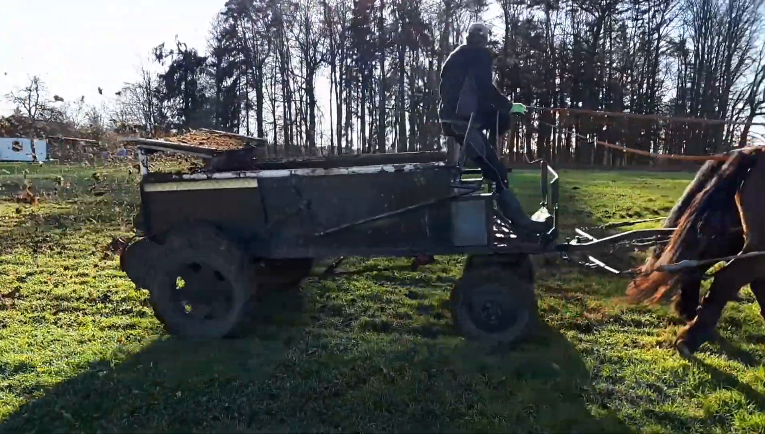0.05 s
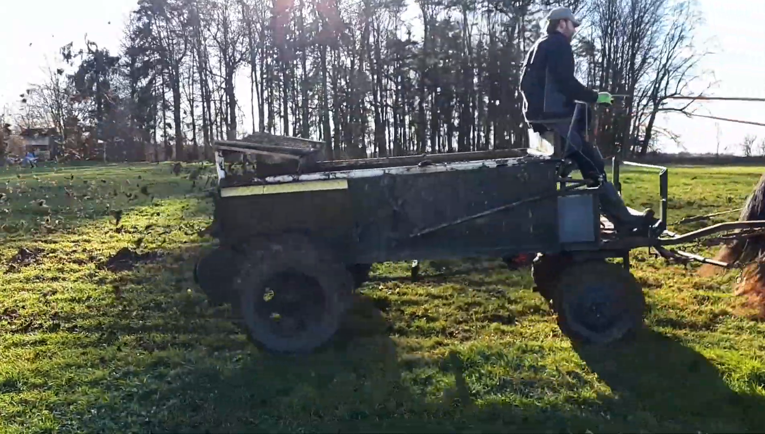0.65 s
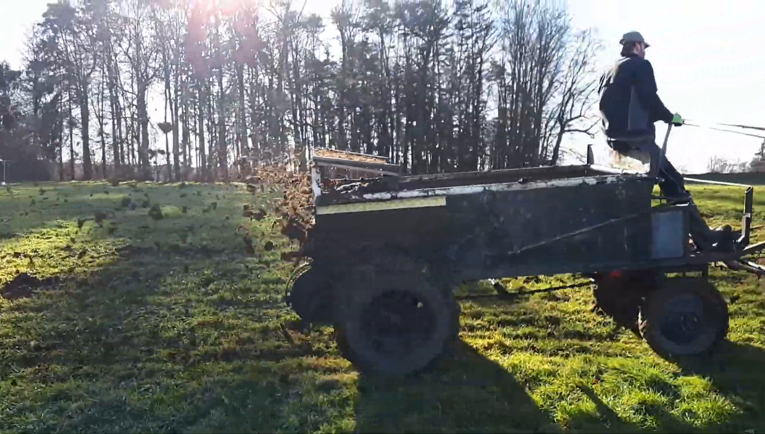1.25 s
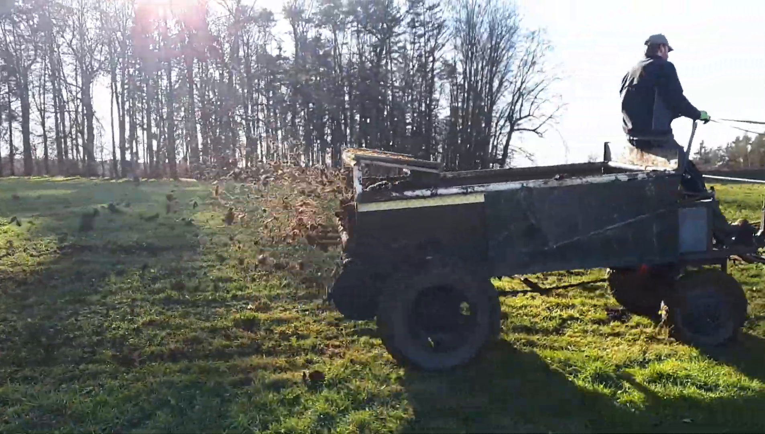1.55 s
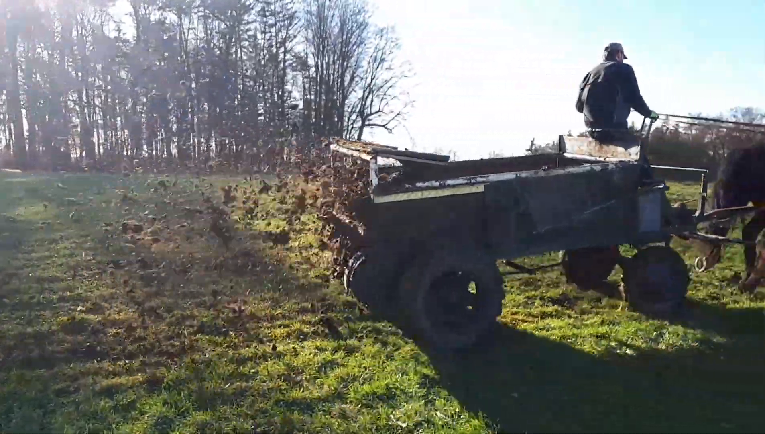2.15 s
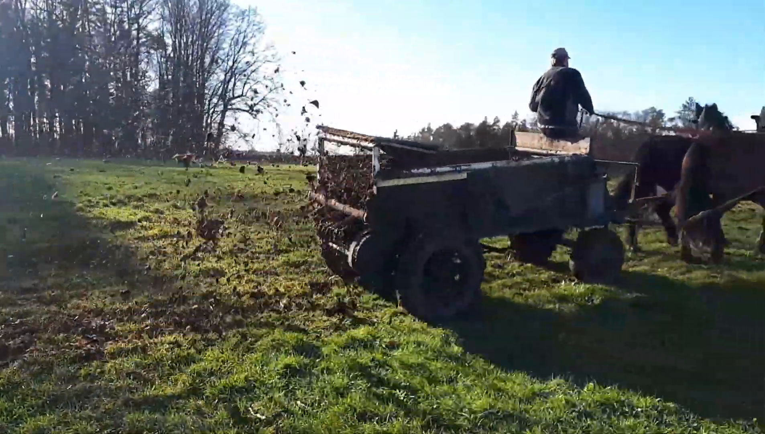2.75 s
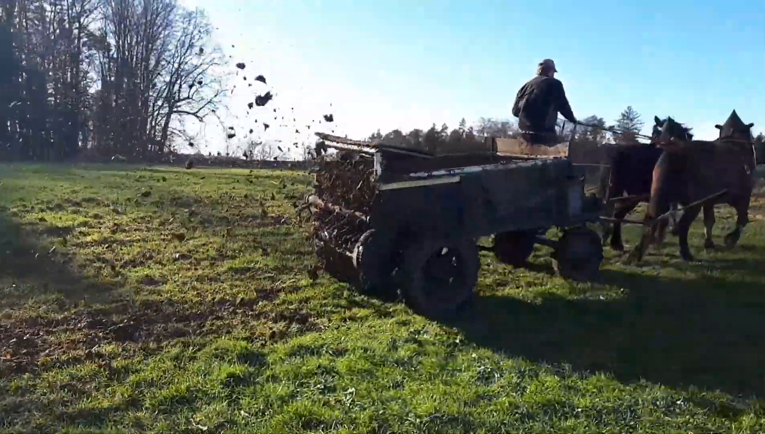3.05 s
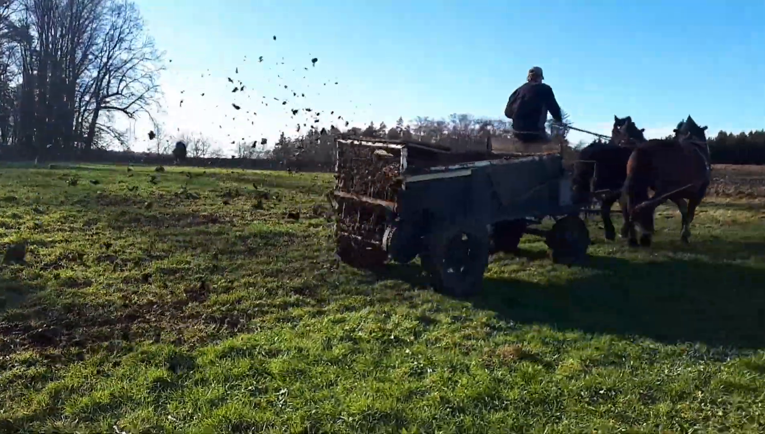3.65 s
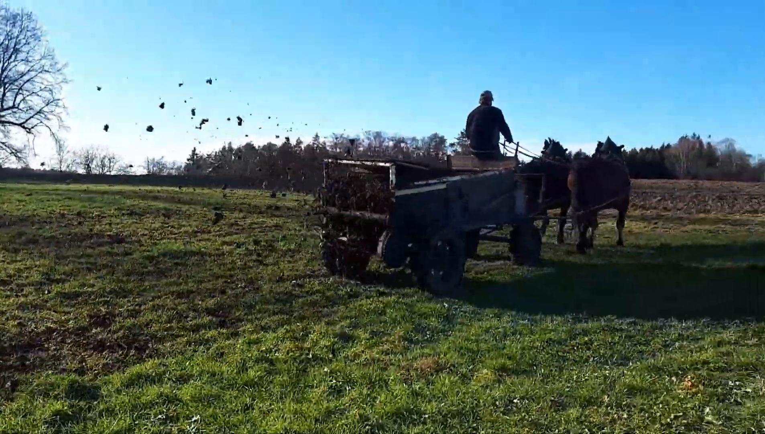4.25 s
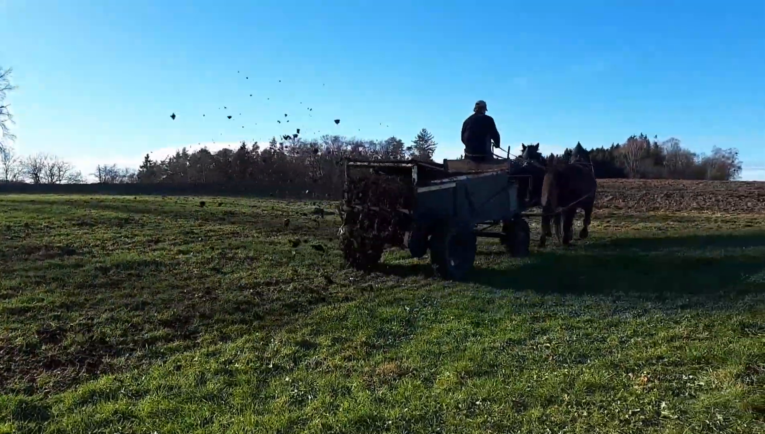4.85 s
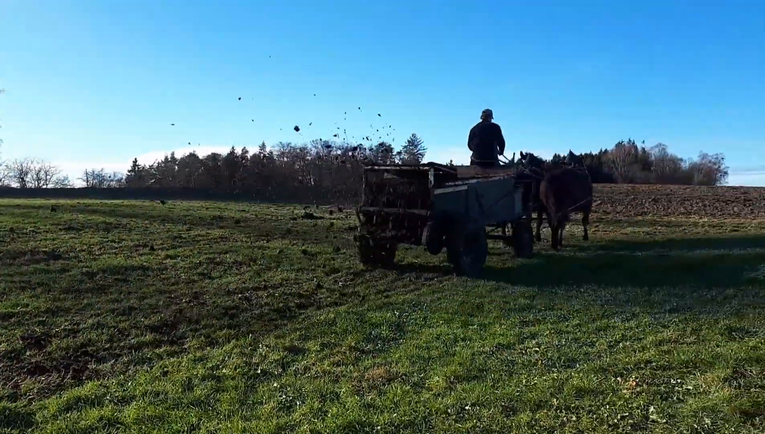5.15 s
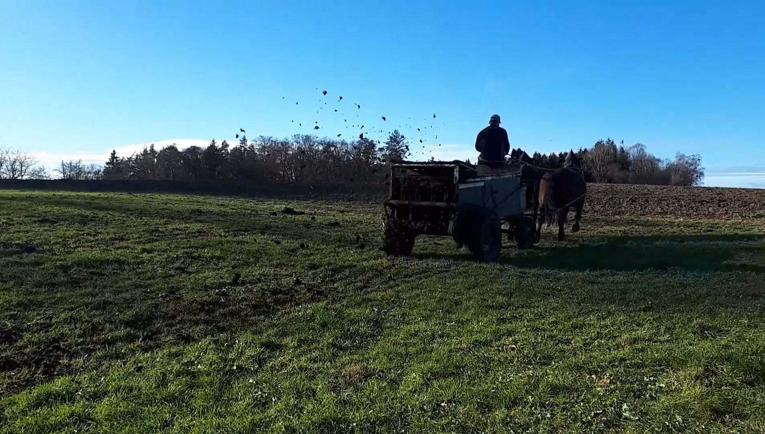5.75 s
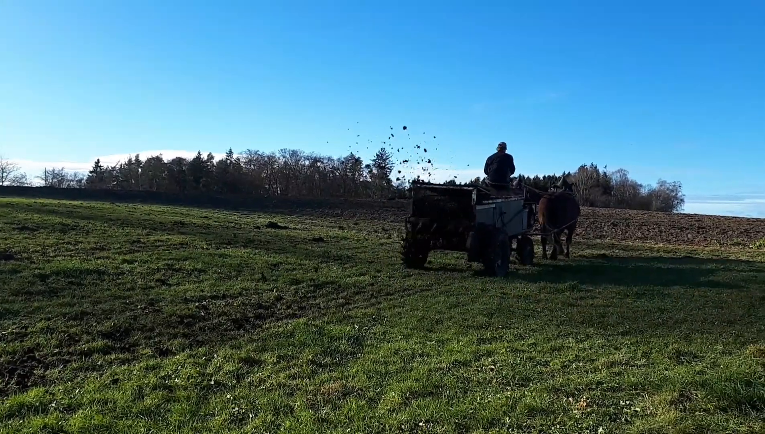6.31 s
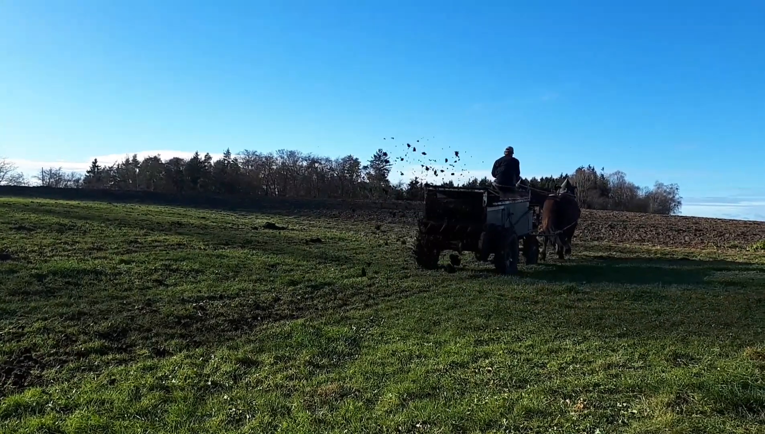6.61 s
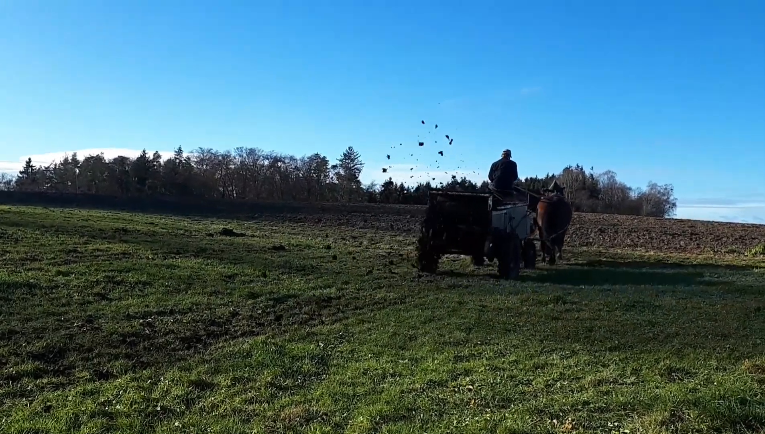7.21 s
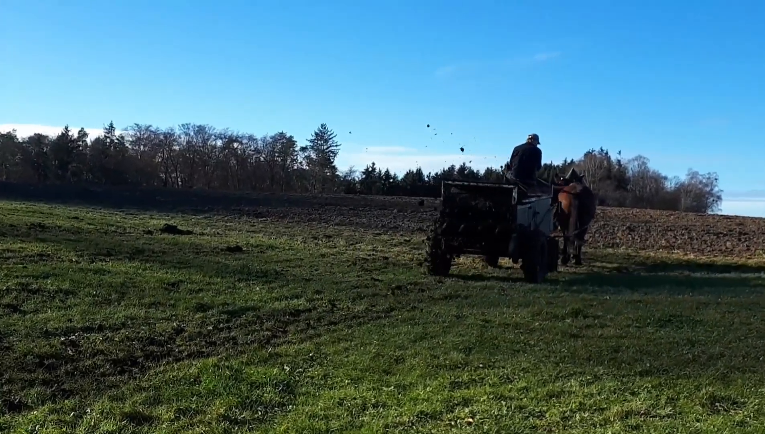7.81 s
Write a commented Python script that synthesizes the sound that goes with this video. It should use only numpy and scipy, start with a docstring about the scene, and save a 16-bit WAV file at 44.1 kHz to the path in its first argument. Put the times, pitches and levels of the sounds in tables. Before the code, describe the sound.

Irregular wooden knocks and a ringing chain clink come from a farm spreader cart rolling near the microphone across a grass field. Underneath, the wheels rumble, the drum churns and straw hisses faintly. The clatter gives way to lighter taps, steel snaps and short scrapes as the cart moves off, while gusts of wind on the microphone build and become the loudest sound near the end.

```python
"""An open grass field, a stereo microphone out in the wind, close to a passing horse-drawn manure spreader.
The cart rumbles by from the left and draws off across the field. Its drive knocks against the boards
of the box, a steel catch snaps, rods scrape and chain links clink. The beater shreds and flings the
load: the drum churns and taps, and straw hisses. Gusts buffet the microphone more and more."""
import sys
import numpy as np
from scipy import signal
from scipy.fft import rfft, irfft, next_fast_len
from scipy.io import wavfile
from scipy.ndimage import map_coordinates

SR = 44100
rng = np.random.default_rng(int(sys.argv[2]) if len(sys.argv) > 2 else 0)


def dump(signal):
    """Clip the signal to [-1, 1] and save it as 16-bit WAV at the path in sys.argv[1]."""
    limited = np.clip(np.atleast_2d(signal).T, -1, 1)
    pcm = np.round(limited * 32767).astype(np.int16)
    wavfile.write(sys.argv[1], SR, pcm)


N = 355887
TIME = np.arange(N) / SR

# resonances of the wooden box, steel frame and beater drum: (frequency [Hz], width [Hz], gain [dB])
BOX = [(392, 69, 4), (597, 39, 2.5), (763, 246, -2), (1080, 273, 5), (1246, 76, 7), (1504, 253, -3.5),
       (1776, 207, 2), (1822, 61, 2.5), (2056, 83, -5.5), (2335, 300, -8.5), (3730, 250, -12.5),
       (4500, 500, -16.5), (5470, 3000, -26), (6850, 390, -30)]
FRAME = [(870, 1250, 7.5), (1810, 290, 12.5), (2425, 184, 21), (2430, 64, -15), (3640, 110, 10),
         (4460, 1320, 6), (4570, 240, 2), (4750, 880, 0), (5930, 650, 6.5), (11270, 1250, -7.5),
         (13000, 9200, -11.5)]
DRUM = [(880, 580, 1.5), (1497, 367, 9), (1676, 270, 11), (2250, 360, 3)]
# the working beater as heard at the microphone: (time [s], churn level [dB], straw level [dB])
BEATER_LEVELS = [(0, -38, -33.5), (.3, -43, -45.5), (1.1, -37, -47), (1.7, -37, -45.5), (2.6, -32.5, -43.5),
                 (3.2, -36.5, -45), (3.8, -38, -47), (5, -36, -46), (6.1, -39, -45.5), (7.4, -41.5, -52),
                 (7.85, -66, -55.5), (8.07, -49, -54)]


def from_db(db):
    """Decibels to gain."""
    return 10 ** (np.asarray(db) / 20)


def rms_one(x):
    """Scale to rms 1."""
    return x / np.sqrt(np.mean(x ** 2) + 1e-20)


def at_level(x, db):
    """Set the rms of the first 20 ms of a blow."""
    return from_db(db) * x / np.sqrt(np.mean(x[:, :SR // 50] ** 2))


def in_time(rows):
    """Each column of a curve at every sample."""
    times, *columns = np.transpose(rows)
    return [np.interp(TIME, times, column) for column in columns]


def at_hz(points, hz):
    """Read a spectrum on a log-frequency axis."""
    known_hz, values = np.transpose(points)
    return np.interp(np.log(hz), np.log(known_hz), values)


def cut(x, hz, kind, order=2):
    """Butterworth filter."""
    return signal.sosfilt(signal.butter(order, hz, kind, fs=SR, output="sos"), x)


def add(out, s, sound):
    """Lay a short sound into the track at s seconds."""
    start = max(round(s * SR), 0)
    out[:, start:start + sound.shape[1]] += sound[:, :N - start]


def flutter(shape, hz):
    """Low-passed noise of rms 1."""
    return rms_one(cut(rng.standard_normal(shape), hz, "low"))


def drift(hz, step=40, settle=2000):
    """Slow random wander of rms 1 over the whole scene."""
    pole = np.exp(-2 * np.pi * hz * step / SR)
    white = rng.standard_normal(N // step + settle + 2)
    slow = signal.lfilter([1], [1, -2 * pole, pole * pole], white)[settle:]
    return np.interp(np.arange(N) / step, np.arange(len(slow)), rms_one(slow))


def stereo(pair, alike):
    """Two unrelated signals serve as mid and side, so that left and right correlate by `alike`."""
    mid = np.sqrt((1 + alike) / 2) * pair[0]
    side = np.sqrt((1 - alike) / 2) * pair[1]
    return np.array([mid + side, mid - side])


def stereo_noise(samples, alike):
    """White noise, partly alike on left and right."""
    return stereo(rng.standard_normal((2, samples)), alike)


def bands(spectrum):
    """Half-octave bands (centre [Hz], pair of noises) shaped by a spectrum; together rms 1."""
    edges = 22 * 2 ** np.arange(0, 9.6, .5)
    white = rng.standard_normal((2, 2, N))
    parts = []
    for k, (low, high) in enumerate(zip(edges, edges[1:])):
        if high > spectrum[0][0] and low < spectrum[-1][0]:
            hz = np.sqrt(low * high)
            parts.append((hz, from_db(at_hz(spectrum, hz)) * cut(white[k % 2], [low, high], "band")))
    total = np.sqrt(sum(np.mean(pair ** 2) for hz, pair in parts))
    return [(hz, pair / total) for hz, pair in parts]


def rustle(spectrum, patchy_db):
    """Stereo noise whose bands flicker partly together, narrow in the bass and wide in the treble."""
    # likeness of left and right: (frequency [Hz], correlation [0-1])
    likeness = [(100, 0.9), (300, 0.86), (640, 1), (1400, 0.57), (3100, 0.21), (6800, 0.28), (15000, 0.06)]
    together = drift(9.7)
    return sum(stereo(pair, at_hz(likeness, hz)) * from_db(patchy_db * (together + drift(40)))
               for hz, pair in bands(spectrum))


def grains(per_s, spread_db, alike, fall_s=0.0038):
    """Random small impacts of uneven size, coming in clumps."""
    hits = rng.random(N) < per_s * from_db(3 * drift(8)) / SR
    sizes = hits * from_db(spread_db * np.minimum(rng.exponential(1, N), 3))
    envelope = signal.lfilter([1], [1, -np.exp(-1 / (fall_s * SR))], sizes + 1e-18)
    return envelope * stereo_noise(N, alike)


def chatter(rise_s, fall_s, tail_db, tail_s, alike, rough_db=1.5, rough_hz=130):
    """Force of a loose contact: a tight burst of tiny blows, then uneven shaking through the cart."""
    t = TIME[:SR // 8]
    burst = (1 - np.exp(-(t / rise_s) ** 2)) * np.exp(-t / fall_s)
    jolts = rms_one(from_db(rough_db * np.minimum(flutter(len(t), rough_hz), 2)))
    tail = from_db(tail_db) * jolts * (1 - np.exp(-t / fall_s)) * np.exp(-t / tail_s)
    return burst * stereo_noise(len(t), alike) + tail * stereo_noise(len(t), alike=0.49)


def resonate(force, body):
    """Drive a body's resonances in parallel, with alternating sign."""
    out = 0
    for k, (hz, width, db) in enumerate(body):
        r = np.exp(-np.pi * width / SR)
        poles = [1, -2 * r * np.cos(2 * np.pi * hz / SR), r * r]
        gain = (-1) ** k * from_db(db) * (1 - r * r) / 2
        out = out + gain * signal.lfilter([1, 0, -1], poles, force + 1e-18)
    return out


def at_spot(body, spread_db):
    """Each spot of contact favours other resonances of a body."""
    return [(hz, width, db + spread_db * rng.uniform(-0.78, 1)) for hz, width, db in body]


def ring(modes, t, rattle=1.0, rattle_hz=45, detune=0.0017):
    """Modes die away, wavering as the part keeps touching its neighbours; no two touches ring alike."""
    hz, db, t60 = np.transpose(modes)[:, :, None]
    hz = hz * (1 + detune * rng.standard_normal(hz.shape))
    waver = 1 + rattle * flutter((len(modes), len(t)), rattle_hz)
    # the higher the mode, the less alike its phase on left and right
    phase = rng.uniform(0, 2 * np.pi, hz.shape) + rng.standard_normal((2, len(modes), 1)) * hz / 7000
    return np.sum(waver * from_db(db - 60 * t / t60) * np.sin(2 * np.pi * hz * t + phase), axis=1)


def struck(force, body, modes, ring_db, swell_s=0.00069):
    """A body is shaken through its broad resonances, while its sharpest modes build up and ring on."""
    t = TIME[:force.shape[1]]
    ringing = ring(modes, t, rattle=0.87) * (1 - np.exp(-t / swell_s))
    return at_level(resonate(force, body), 0) + at_level(ringing, ring_db)


def rolling(boards_db=-7.0):
    """The wheels rumble over the turf and the boards of the box tremble."""
    # the rumble at the microphone: (time [s], level [dB])
    rumble_levels = [(0, -35.5), (.9, -36), (2, -38), (3, -40.5), (4.3, -42.5), (5.5, -46), (6.3, -40.5),
                     (8.07, -57)]
    # wheels on turf: (frequency [Hz], relative density [dB])
    rumble_spectrum = [(60, -22), (150, 2.5), (300, 5.5), (450, 3), (700, 4.5), (1000, -1.5), (1350, -7),
                       (2500, -32)]
    rumble_db, = in_time(rumble_levels)
    bumps = grains(per_s=71, spread_db=8.5, alike=0.88)
    boards = rms_one(cut(resonate(bumps, BOX), 590, "low"))
    return from_db(rumble_db) * (rustle(rumble_spectrum, patchy_db=2.5) + from_db(boards_db) * boards)


def beater(churn_db=-7.5, straw_db=-3.5, ticks_db=-7.0):
    """Tines tear at the load and set the drum ringing, straw hisses and grit ticks on the frame."""
    # flung straw: (frequency [Hz], relative density [dB])
    straw_spectrum = [(1500, 1.5), (2800, 5), (3600, 4.5), (4500, 4), (6500, -5), (8500, -13.5),
                      (11000, -9), (15000, -3)]
    work_db, spray_db = in_time(BEATER_LEVELS)
    churn = rms_one(resonate(grains(per_s=460, spread_db=5.0, alike=0.84), DRUM))
    ticks = rms_one(resonate(grains(per_s=60, spread_db=3.5, alike=0.99), FRAME))
    spray = from_db(straw_db) * rustle(straw_spectrum, patchy_db=1.72) + from_db(ticks_db) * ticks
    return from_db(work_db + churn_db) * churn + from_db(spray_db) * spray


def air(level_db=-53.5):
    """A faint, even hiss lies behind everything."""
    # background hiss: (frequency [Hz], relative density [dB])
    hiss_spectrum = [(100, 18), (1000, 21.5), (3000, -21), (6000, 10.5), (8500, -17), (11000, -5),
                     (15500, 8)]
    return from_db(level_db) * sum(pair for hz, pair in bands(hiss_spectrum))


def wind_strength(attack_s=0.0098, release_s=0.011):
    """Level of the wind in dB: each gust swells, holds and drops on top of the breeze."""
    # the breeze between gusts: (time [s], level [dB])
    breeze = [(0, -44), (1.2, -33.5), (2.3, -43), (3.0, -39), (3.9, -42), (4.35, -56), (4.9, -28.5),
              (5.35, -47.5), (5.9, -41.5), (6.45, -28), (6.88, -33), (7.5, -23.5), (7.85, -28),
              (8.07, -38.5)]
    # gusts that strike the microphone: (start [s], hold [s], level [dB])
    gusts = [(0.415, 0.02, -24.5), (1.073, 0.17, -28), (3.19, 0.043, -26), (3.361, 0.025, -27),
             (3.628, 0.017, -27), (3.674, 0.028, -28), (3.819, 0.047, -22.5), (3.895, 0.019, -19),
             (3.931, .025, -26.5), (4.03, 0.012, -28), (4.102, 0.084, -31.5), (4.565, 0.027, -36),
             (4.712, .015, -22), (4.762, 0.012, -19.5), (4.815, 0.018, -22.5), (4.838, 0.014, -18),
             (4.924, 0.022, -26.5), (4.981, 0.028, -24.5), (5.02, 0.023, -27), (5.08, 0.0049, -22),
             (5.13, 0.016, -33), (5.338, 0.011, -33), (5.384, 0.0067, -29), (5.588, 0.2, -34),
             (6.002, 0.011, -30.5), (6.09, 0.011, -16), (6.124, 0.017, -18), (6.177, 0.026, -19.5),
             (6.23, 0.032, -13.5), (6.269, .03, -14), (6.314, 0.024, -11.5), (6.362, 0.043, -15),
             (6.546, 0.0052, -20), (6.583, 0.01, -26), (6.634, 0.017, -15), (6.667, 0.029, -16),
             (6.77, 0.022, -16.5), (6.805, 0.026, -12), (6.937, .025, -17), (6.983, .018, -20),
             (7.029, 0.016, -24.5), (7.076, 0.014, -17), (7.125, 0.048, -21.5), (7.186, .045, -15),
             (7.272, 0.047, -19.5), (7.353, 0.017, -19), (7.4, 0.022, -15.5), (7.447, 0.023, -12.5),
             (7.491, 0.039, -15.5), (7.555, 0.017, -18), (7.63, 0.039, -24.5), (7.738, 0.045, -20.5)]
    t = TIME[::20]
    power = from_db(np.interp(t, *np.transpose(breeze))) ** 2
    for s, hold, db in gusts:
        fade = np.maximum(s - t, 0) / attack_s + np.maximum(t - s - hold, 0) / release_s
        power += (from_db(db) * np.exp(-np.minimum(fade, 20))) ** 2
    return np.interp(TIME, t, 10 * np.log10(power))


def eddies(per_s=170, fall_s=0.0055, spread_db=2.4, steady=0.51, soften_hz=280, slowest_hz=14):
    """Quick swing in dB at each microphone port: eddies hit abruptly and ebb, over the steady flow."""
    hits = (rng.random((2, N)) < per_s / SR) * from_db(rng.uniform(-spread_db, spread_db, (2, N)))
    push = rms_one(signal.lfilter([1], [1, -np.exp(-1 / (fall_s * SR))], hits))
    flow_db = cut(20 * np.log10(push + steady), soften_hz, "low", order=3)
    swing_db = cut(flow_db, slowest_hz, "high")
    return swing_db - 10 * np.log10(np.mean(from_db(swing_db) ** 2))  # mean power 1


def wind(level_db=0.94, brighten=0.28, windward_db=0.85):
    """Wind buffets both ports; a stronger gust sheds smaller eddies and sounds brighter."""
    # wind on the microphone: (frequency [Hz], relative density [dB])
    buffet_spectrum = [(20, -25), (40, -51), (70, -4), (110, 2.5), (180, 0.5), (330, 1), (450, -8),
                       (650, -19.5), (1000, -46), (1500, -68), (3000, -63), (6000, -104)]
    gust_db = wind_strength()
    eddy_db = gust_db + eddies()
    excess_db = eddy_db - np.mean(gust_db)
    buffets = sum(pair * from_db(eddy_db + brighten * np.clip(np.log2(hz / 280), -1.5, 2) * excess_db)
                  for hz, pair in bands(buffet_spectrum))
    port_db = windward_db * np.array([[-.5], [.5]])  # the right port catches more wind
    return from_db(level_db + port_db) * buffets


def jangle(t, fall_s):
    """Links rub and tick against each other after a touch."""
    # resonances of the chain: (frequency [Hz], width [Hz], gain [dB])
    chain = [(3980, 2300, 15.5), (6500, 2000, 13), (11400, 2500, -1.5), (13300, 4500, -10), (15300, 900, 4)]
    rubbing = stereo_noise(len(t), alike=0.06) * np.exp(-t / fall_s)
    return resonate(rubbing, at_spot(chain, spread_db=3.0))


def clinks(ring_db=-10.5, jangle_db=-1.5):
    """A heavy chain link rings on in clusters of modes while it jangles against its neighbours."""
    # blows on the link: (time [s], level [dB], relative jangle [dB])
    hits = [(0.07, -11, -11.5), (2.6934, -32, -8.5), (3.012, -35.5, -4), (3.5154, -30, -10),
            (5.061, -34, -5)]
    # modes of the link: (frequency [Hz], level [dB], t60 [s])
    heavy_link = [(1990, 0, .15), (2170, -1.5, .15), (2348, 3, .19), (2548, 2, .19), (3445, 0, .2),
                  (3640, -6, .25), (4382, -9, .2), (4818, -6, .15), (5074, -4, .35), (5138, -4.5, .6),
                  (5573, 0.5, .27), (5615, 0.5, .25), (6180, -6, .16), (6345, -4, .22), (6470, -5, .18),
                  (6598, 0, .2), (6684, -3, .2), (6730, 1, .29), (7122, -11, .16), (7768, -11, .15),
                  (8100, -11, .14), (9049, -15, .12), (11180, -10, .25), (12150, -12, .25),
                  (13920, -11, .15), (14970, -8, .19), (15320, -4, .12), (15560, -4, .1)]
    out, t = np.zeros((2, N)), TIME[:SR // 3]
    for s, db, loose_db in hits:
        link = at_level(ring(heavy_link, t, rattle=0.69, rattle_hz=70, detune=0.0007), db + ring_db)
        neighbours = at_level(jangle(t, fall_s=0.023), db + loose_db + jangle_db)
        add(out, s, link + neighbours)
    return out


def knocks(boards_db=-10.0, tone_db=-11.5, tone_width_hz=42, lead_s=0.00201, thump_lag_s=0.0014):
    """The drive knocks on the box: a thump, a crack, the struck board's tone and loose boards rattling."""
    # knocks, often in pairs:
    # (time [s], level [dB], relative thump [dB], relative crack [dB], pitch [Hz], chatter decay [s])
    blows = [(0.134, -18, -9, -29, 1013, 0.0075), (0.177, -21.5, -17, -16, 764, .005),
             (0.194, -28, -18, -11, 1900, .005), (0.401, -15, -11.5, -10.5, 1200, 0.003),
             (0.58, -15.5, -14, -38, 1030, 0.0075), (0.624, -8.5, -17.5, -10, 1017, 0.0049),
             (0.787, -16.5, -15, -25, 1000, 0.0033), (0.797, -13, -10.5, -17.5, 765, 0.0054),
             (0.839, -10, -30, -14, 770, 0.0047), (0.849, -15.5, -14, -16, 960, 0.0093),
             (1.006, -16, -19, -7, 770, .0065), (1.069, -14.5, -20, -9, 1964, 0.0042),
             (1.235, -11, -17, -15, 986, 0.0048), (1.309, -21, -8.5, -13.5, 745, 0.0044),
             (1.468, -13, -7, -10, 1262, 0.0063), (1.782, -33, 4.5, -14, 570, 0.0062),
             (2.034, -16.5, -7, -8.5, 1860, .006), (2.063, -21.5, -8.5, -16, 1850, 0.011),
             (2.121, -32.5, -18, -13, 650, 0.0035), (2.248, -22.5, -11.5, -19, 1706, 0.0051),
             (2.472, -23.5, -5.5, -10, 926, 0.0036), (2.511, -31, -11, -16, 630, 0.0039),
             (2.647, -27, -35, -8, 1890, .004), (2.692, -19, -10, -28, 1720, 0.0077),
             (2.755, -38, -14, -16, 762, .005), (2.789, -34, -10, -12, 746, 0.0055),
             (2.927, -22.5, -6.5, -22, 537, 0.0035), (3.175, -30, -8, -11, 600, 0.0043),
             (3.39, -29.5, -28, -15, 1680, .004), (3.667, -31, -9, -19, 810, 0.0029),
             (3.937, -30, -7, -11.5, 1630, 0.0042), (4.205, -21, -14, -20, 710, 0.004),
             (4.34, -25.5, -26, -18, 1580, .006), (4.454, -18.5, -8, -36, 924, 0.0047),
             (4.523, -33, -10, -20, 1030, 0.0052), (4.609, -44, -27, -3, 2170, 0.0052),
             (4.715, -21, -8, -18, 704, 0.0032), (4.802, -24.5, -18, -16, 2060, 0.0076),
             (5.2, -34, -12, -15, 1400, 0.0035), (5.894, -35, -30, -3, 2300, 0.0044),
             (5.938, -35.5, -30, -5, 2330, 0.0068), (6.043, -38, -18, -21, 783, .004),
             (6.989, -30.5, -18, -16, 1300, 0.0046), (7.298, -30.5, -16, -20, 1770, .005)]
    # modes of the boards: (frequency [Hz], level [dB], t60 [s])
    board_modes = [(450, -10, 0.0098), (622, 14, 0.019), (733, -8, 0.22), (1007, 18.5, 0.014),
                   (1454, 6.5, 0.051), (1870, 8.5, 0.024), (2150, -9, 0.072), (2545, 1, 0.036),
                   (3500, -13, 0.037)]
    out = np.zeros((2, N))
    for s, db, thump_db, crack_db, hz, fall_s in blows:
        force = chatter(rise_s=0.0022, fall_s=fall_s, tail_db=-13.5, tail_s=0.022, alike=0.81,
                        rough_db=3.0, rough_hz=110)
        wood = struck(force, at_spot(BOX, spread_db=3.5), board_modes, ring_db=-2.5)
        thump = at_level(cut(wood, 627, "low", order=4), db + thump_db)
        boards = at_level(cut(wood, [600, 2700], "band", order=4), db + boards_db)
        tone = at_level(resonate(force, [(hz, tone_width_hz, 0)]), db + tone_db)
        crack = at_level(cut(wood, 2240, "high", order=4), db + crack_db)
        add(out, s - lead_s, boards + tone + crack)
        add(out, s - lead_s + thump_lag_s, thump)
    return out


def jingles(jangle_db=-5.0, gap_s=0.0051, loss_db=5, faint_per_s=2, faint_db=-13, faint_sparkle_db=-7):
    """Five light links of unequal size touch in turn, each more weakly; faint clashes come at random."""
    # clashes of the links: (time [s], level [dB], relative sparkle [dB])
    clashes = [(0.235, -59.5, 5), (0.345, -57, -1), (0.665, -48, -7), (0.985, -51, -7), (1.268, -47, -4),
               (1.285, -41, 3), (1.348, -32, -7), (1.357, -29, -9.5), (1.88, -55, 3), (2.7, -48, -3),
               (3.01, -50, -1), (3.51, -48, -1)]
    # modes of a light link: (frequency [Hz], level [dB], t60 [s])
    light_link = [(3600, 3, 0.11), (4050, -1, 0.14), (4200, 5, .1), (4750, 5, 0.1), (5370, -5, .09),
                  (6060, 5, 0.18), (7000, 2, 0.24), (7500, -4, 0.13), (11800, -4, 0.12), (12100, -3, 0.11),
                  (15100, -4, .1), (15400, -1, .09)]
    out, t = np.zeros((2, N)), TIME[:SR // 9]
    times = np.cumsum(rng.exponential(1, 80)) / faint_per_s
    when, _, straw_db = np.transpose(BEATER_LEVELS)
    faint = [(s, np.interp(s, when, straw_db) + faint_db, faint_sparkle_db)
             for s in times if s < TIME[-SR // 8]]
    for s, db, sparkle_db in list(clashes) + faint:
        for k in range(5):
            link = at_level(ring(light_link, t, detune=0.03), 0)
            link += at_level(jangle(t, fall_s=0.036), jangle_db)
            body = at_level(cut(link, 9100, "low", order=4), db)
            sparkle = at_level(cut(link, 9600, "high", order=3), db + sparkle_db)
            add(out, s + gap_s * k * rng.uniform(0.7, 1.4), from_db(-loss_db * k) * (body + sparkle))
    return out


def snaps(frame_db=-12.0, low_db=-11, high_db=-12, bite_db=-4.5, fizz_db=-8.5, lead_s=0.00066):
    """The catch hits the frame and rings briefly in two tones; each blow has its own bite and fizz."""
    # steel on steel: (time [s], level [dB], relative brightness [dB], relative upper tone [dB])
    blows = [(0.274, -34.5, -2, 4), (0.379, -29, -6, 9.5), (0.743, -33.5, -5.5, 6), (1.433, -30, -6, -4),
             (1.4696, -28, 0, -13), (1.7294, -24.5, -9.5, -2), (2.0339, -16.5, -34, -17),
             (2.075, -33, -10, 3), (2.209, -28.5, -8.5, -4), (2.263, -30.5, -6.5, -3),
             (2.443, -23.5, -5.5, -16), (2.483, -28.5, -1.5, -12), (3.582, -32, -7.5, -1),
             (3.637, -28.5, -8.5, 1), (4.4184, -26, -5.5, 7), (4.672, -41.5, -7, 12),
             (4.714, -28, -22, 7.5), (4.861, -37.5, -7, -5), (4.941, -29, -7, 1),
             (5.0022, -12.5, -13.5, -7), (5.0891, -22.5, -12.5, -9), (5.1477, -24.5, -8, 1.5),
             (5.334, -22, -10.5, -10), (5.369, -32.5, -10, 6.5), (5.5768, -18.5, -8.5, -10),
             (6.095, -35, -5, -11), (6.164, -31, 0.5, 4), (6.346, -29, -12, -3), (6.587, -30, -10.5, -11),
             (7.092, -33.5, -7.5, -8), (7.294, -33.5, -0.5, 5), (7.362, -28.5, -10, -6),
             (7.673, -34, -6, -10), (7.8312, -35, -14, -14)]
    # the earliest snaps are mostly rattle, the later ones crisp: (time [s], shaking over direct blow [dB])
    scatter = [(0, 17), (2, -21), (4.4, -17), (5.8, -21), (6.8, -19), (8.07, -17)]
    # modes of the frame, and the close pair in the lower tone: (frequency [Hz], level [dB], t60 [s])
    frame_modes = [(1930, -2, 0.037), (4360, 9.5, 0.021), (4490, 8, 0.017), (5080, 5, 0.039),
                   (5340, 5.5, .025), (6310, -10, 0.076), (7460, -14, 0.047)]
    catch_modes = [(2133, -10.5, 0.068), (2282, 1.5, 0.028)]
    catch_low, catch_high = [(2230, 150, 0)], [(3600, 164, 0)]  # (frequency [Hz], width [Hz], gain [dB])
    out = np.zeros((2, N))
    for s, db, bright_db, upper_db in blows:
        scatter_db = np.interp(s, *np.transpose(scatter))
        force = chatter(rise_s=0.0008, fall_s=0.0035, tail_db=scatter_db, tail_s=0.019, alike=0.83)
        steel = struck(force, at_spot(FRAME, spread_db=5.5), frame_modes, ring_db=-6.0)
        frame = at_level(cut(steel, 2430, "low", order=4), db + frame_db)
        low_tone = at_level(struck(force, catch_low, catch_modes, ring_db=6.0), db + low_db)
        high_tone = at_level(resonate(force, catch_high), db + high_db + upper_db)
        bite = at_level(cut(steel, [3900, 7200], "band", order=3), db + bright_db + bite_db)
        fizz = at_level(cut(steel, 8500, "high", order=4), db + bright_db + fizz_db)
        add(out, s - lead_s, frame + low_tone + high_tone + bite + fizz)
    return out


def scrapes(band_hz=(2300, 5200), grit_db=3.5, grit_hz=300):
    """A loose rod slips along the frame in a short gritty run that swells and fades."""
    # runs of the rods: (time [s], length [s], level [dB])
    runs = [(0.33, 0.038, -40), (2.435, 0.029, -33), (2.975, 0.055, -47), (4.913, 0.022, -41),
            (6.559, .015, -46), (6.824, 0.026, -39.5), (6.978, 0.037, -37.5), (7.081, .028, -40),
            (7.35, .035, -39), (7.627, .015, -50), (7.648, 0.044, -45.5)]
    out = np.zeros((2, N))
    for s, length, db in runs:
        t = TIME[:int(2 * length * SR)]
        slips = from_db(grit_db * flutter(len(t), grit_hz))
        swell = np.sqrt(t / length) * np.exp(-2 * (t / length) ** 2)
        force = slips * swell * stereo_noise(len(t), alike=0.54)
        add(out, s, at_level(cut(resonate(force, FRAME), band_hz, "band"), db))
    return out


def taps(drum_db=-18.0, frame_db=-22.5, light_per_s=5, light_db=9.5, spread_db=2):
    """Small knocks sound on the drum and frame; light taps come at random and follow the churn level."""
    # small knocks: (time [s], level [dB])
    small_knocks = [(0.359, -16), (0.6868, -18), (1.925, -20.5), (1.9494, -24), (2.5296, -25), (2.884, -30),
                    (2.906, -20), (3.1252, -20), (3.1507, -19), (3.3505, -30), (3.411, -19), (3.428, -21),
                    (3.557, -25), (3.616, -21.5), (3.688, -34), (3.715, -31), (3.9948, -19), (4.038, -19.5),
                    (4.055, -29), (4.304, -21), (4.543, -34), (4.9193, -21), (4.985, -21), (5.371, -23),
                    (5.395, -23), (5.763, -25), (5.875, -21), (5.915, -25), (6.4017, -21)]
    out = np.zeros((2, N))
    gap_draw, size_draw = rng.random((200, 2)).T
    times = np.cumsum(-np.log(1 - gap_draw)) / light_per_s
    when, churn_db, _ = np.transpose(BEATER_LEVELS)
    levels = np.interp(times, when, churn_db) + light_db + spread_db * (1 - 2 * size_draw)
    light_taps = [(s, db) for s, db in zip(times, levels) if s < TIME[-1]]
    for s, db in list(small_knocks) + light_taps:
        force = chatter(rise_s=0.0016, fall_s=0.0046, tail_db=-17, tail_s=0.064, alike=0.88)
        drum = at_level(resonate(force, DRUM), db + drum_db)
        frame = at_level(resonate(force, FRAME), db + frame_db)
        add(out, s, drum + frame)
    return out


def passing(cart):
    """The cart's sound reaches the nearer side of the microphone first."""
    # bearing of the cart: (time [s], lag of the left channel [ms])
    bearing = [(0, -0.13), (.8, -0.11), (1.8, -0.021), (5, -0.0082), (6.3, 0.059), (8.07, 0.016)]
    lag_ms, = in_time(bearing)
    left = map_coordinates(cart[0], [(TIME - lag_ms / 1000) * SR], order=3)
    return np.array([left, cart[1]])


def scene():
    """The cart passes in the open field, with wind on the microphone and a faint hiss behind."""
    hiss = air()
    cart = knocks() + snaps() + scrapes() + clinks() + jingles() + taps() + rolling() + beater()
    return passing(cart) + wind() + hiss


def record(dry, ceiling=0.74, cutoff_hz=15750):
    """Each microphone port adds its own colour, the loudest peaks are rounded off and the top is cut."""
    # colour of the two ports: (frequency [Hz], left minus right [dB])
    ports = [(500, 0.5), (2400, -.5), (3200, 3), (4200, 0.5), (6000, 2), (7600, -1.5), (9500, -3.5),
             (15000, 0.5)]
    size = next_fast_len(N + SR // 10)
    tilt_db = at_hz(ports, np.maximum(np.fft.rfftfreq(size, 1 / SR), 1))
    coloured = irfft(rfft(dry, size) * from_db(tilt_db * np.array([[.5], [-.5]])), size)[:, :N]
    rounded = ceiling * np.tanh(coloured / ceiling)
    return signal.sosfilt(signal.ellip(10, .2, 80, cutoff_hz, fs=SR, output="sos"), rounded)


dry = scene()
out = record(dry)
dump(out)
```